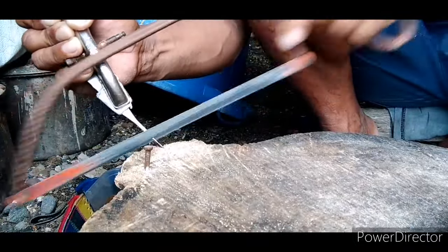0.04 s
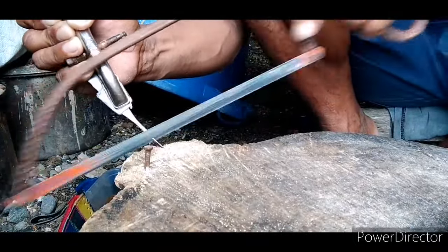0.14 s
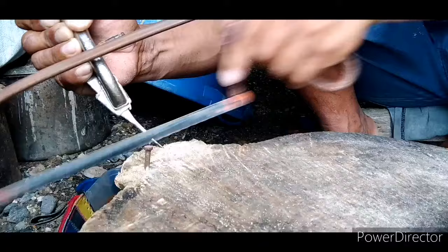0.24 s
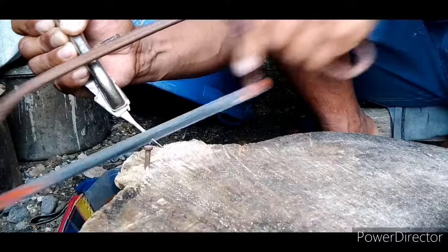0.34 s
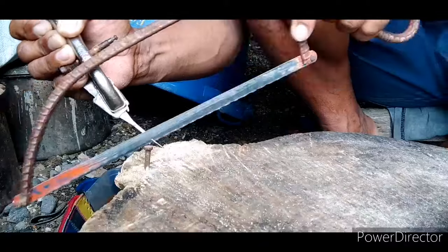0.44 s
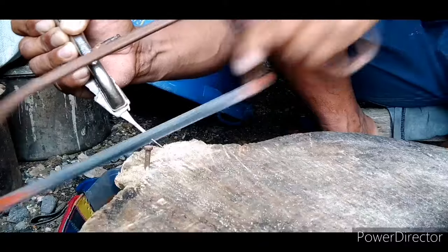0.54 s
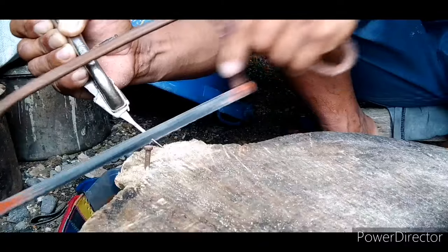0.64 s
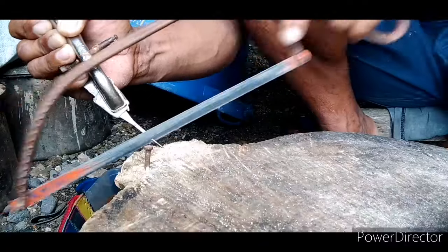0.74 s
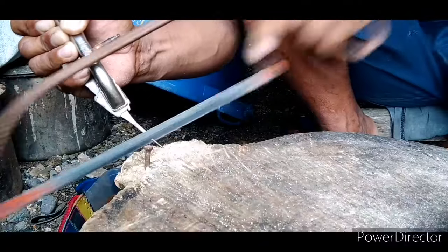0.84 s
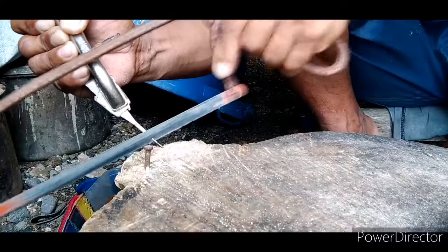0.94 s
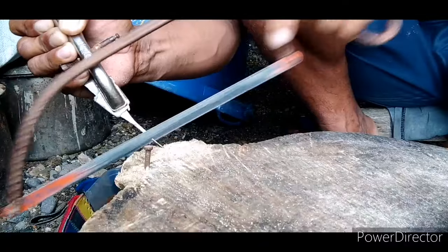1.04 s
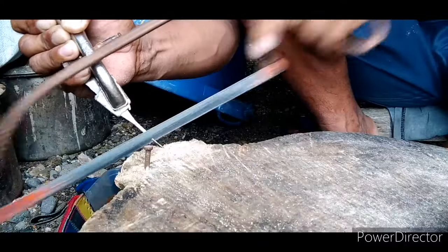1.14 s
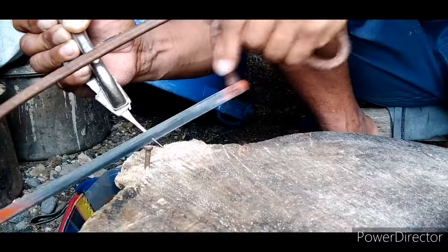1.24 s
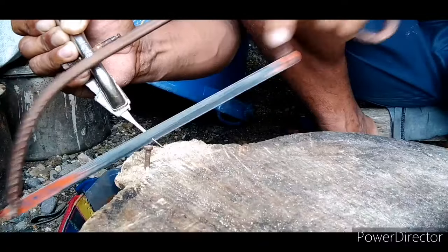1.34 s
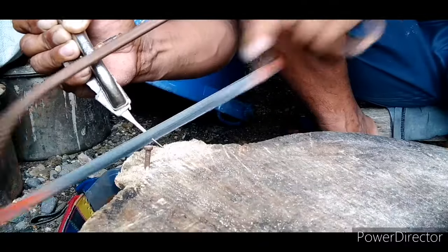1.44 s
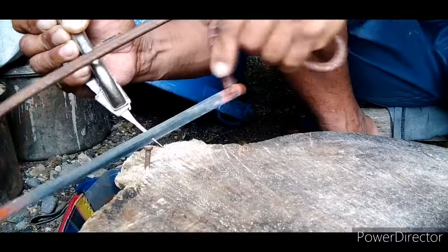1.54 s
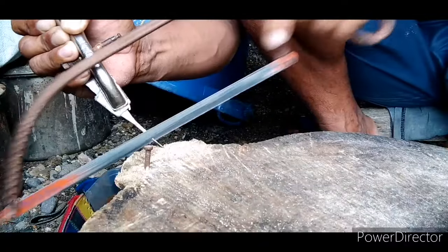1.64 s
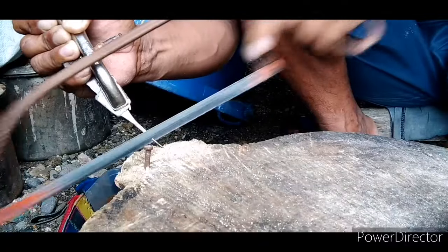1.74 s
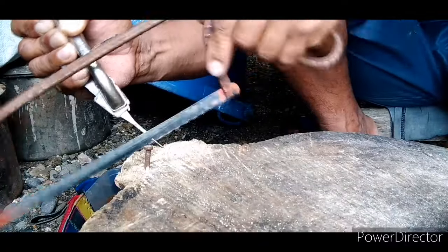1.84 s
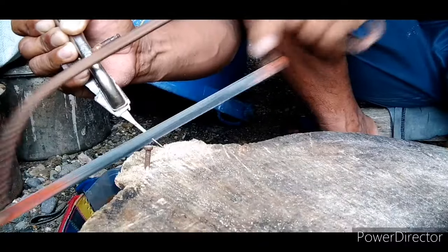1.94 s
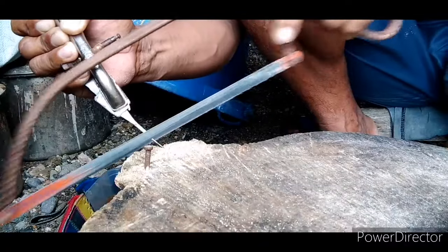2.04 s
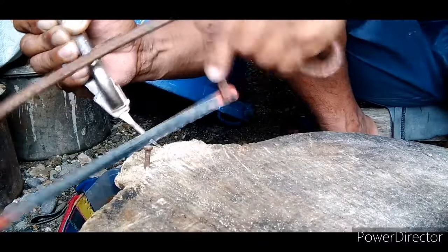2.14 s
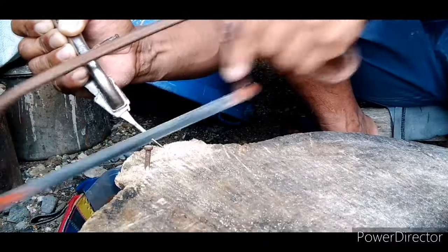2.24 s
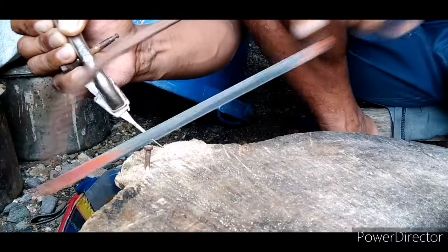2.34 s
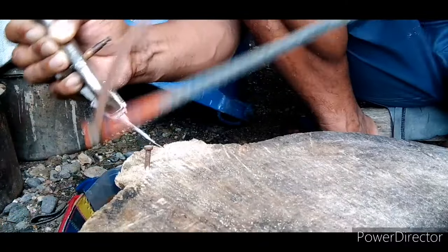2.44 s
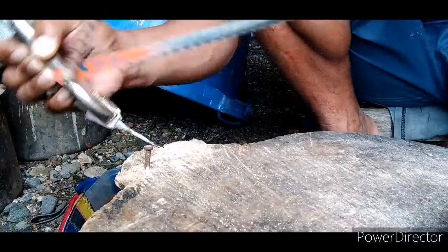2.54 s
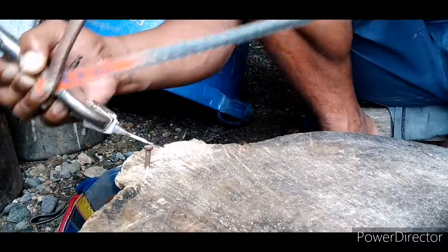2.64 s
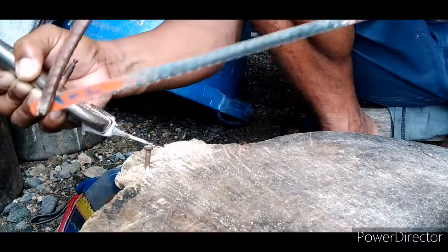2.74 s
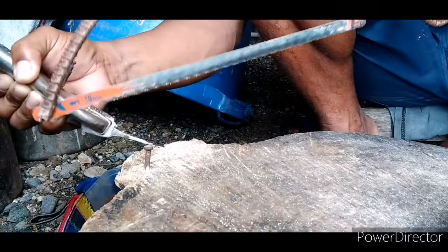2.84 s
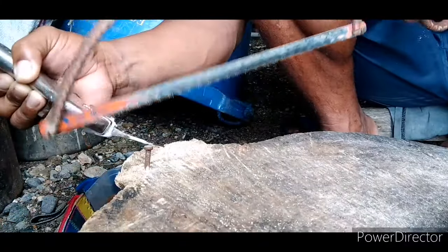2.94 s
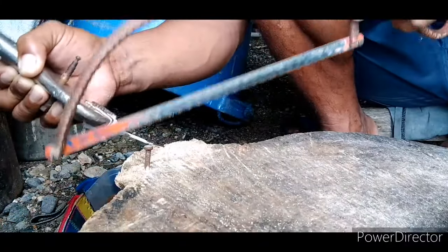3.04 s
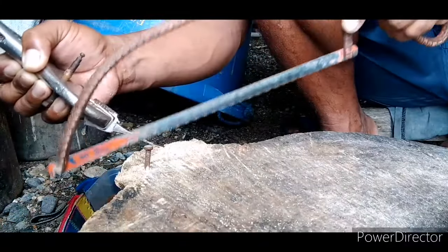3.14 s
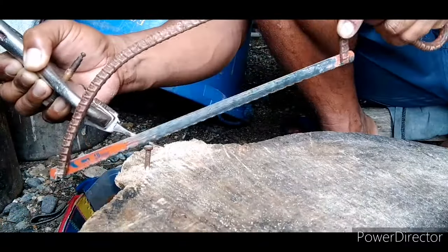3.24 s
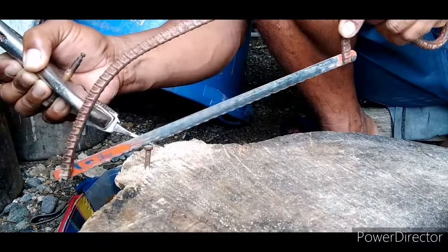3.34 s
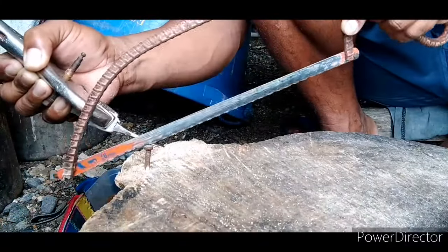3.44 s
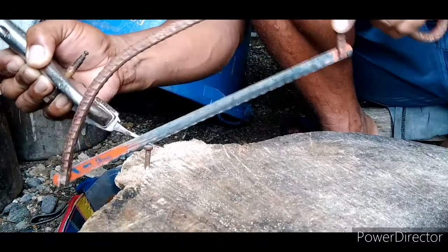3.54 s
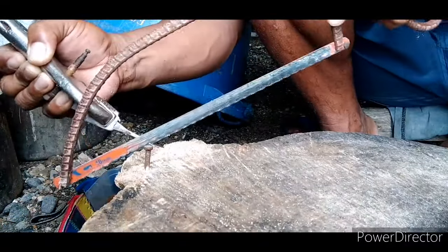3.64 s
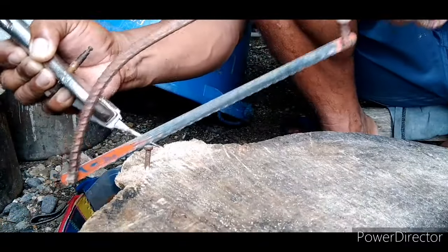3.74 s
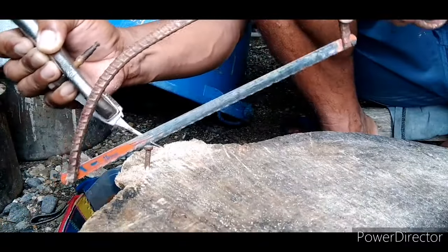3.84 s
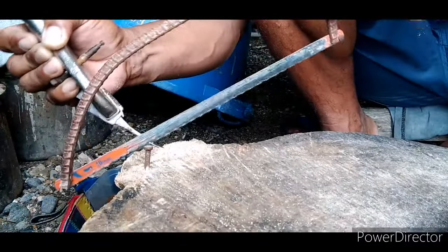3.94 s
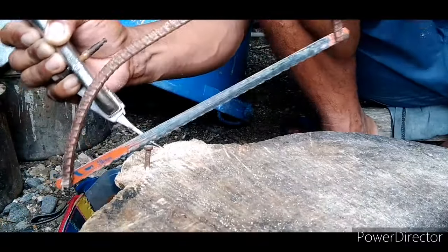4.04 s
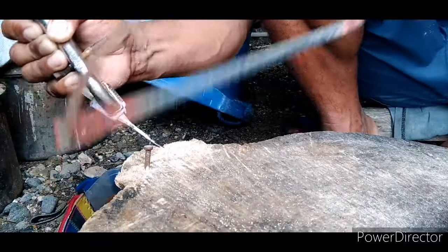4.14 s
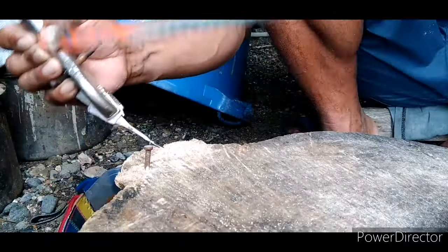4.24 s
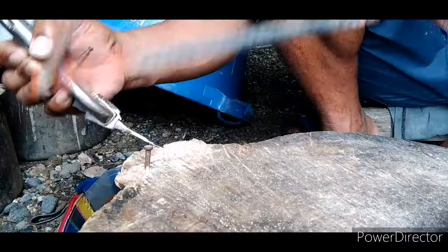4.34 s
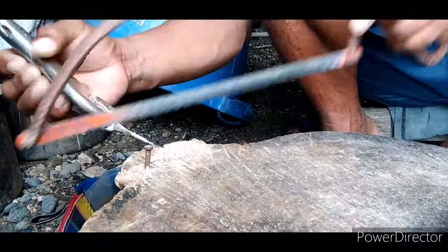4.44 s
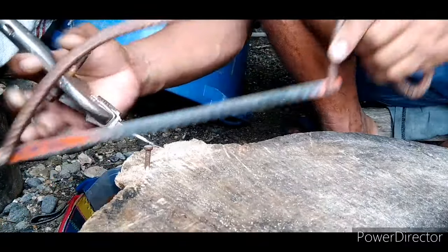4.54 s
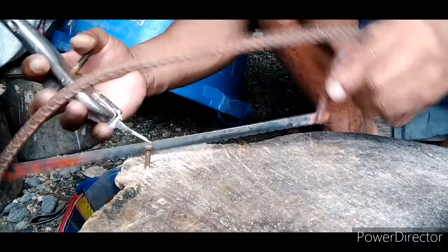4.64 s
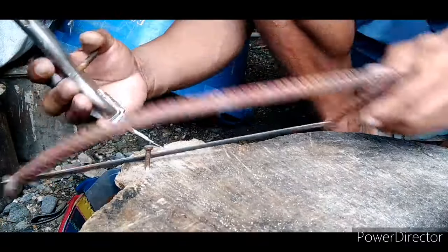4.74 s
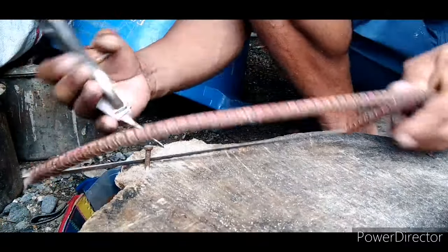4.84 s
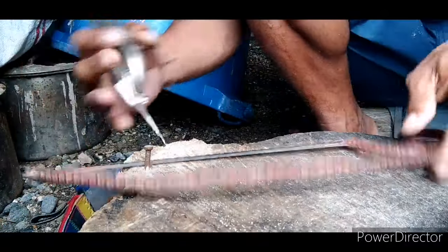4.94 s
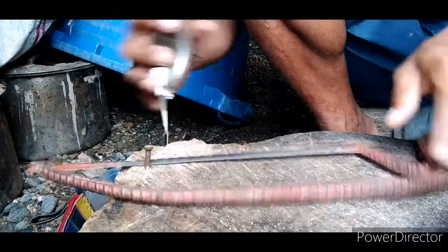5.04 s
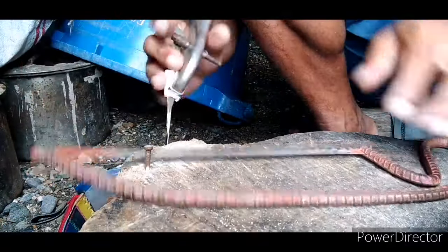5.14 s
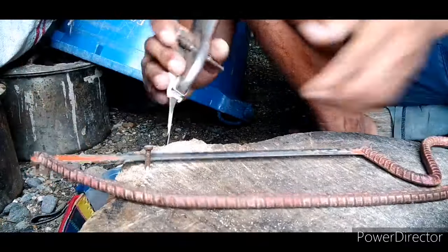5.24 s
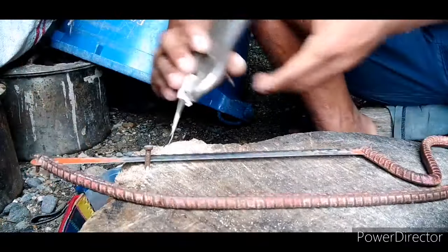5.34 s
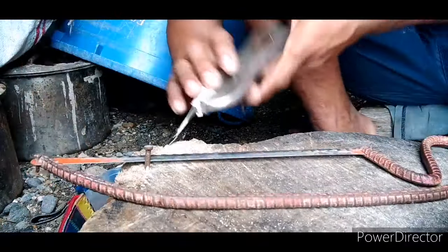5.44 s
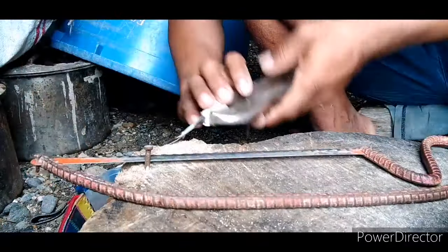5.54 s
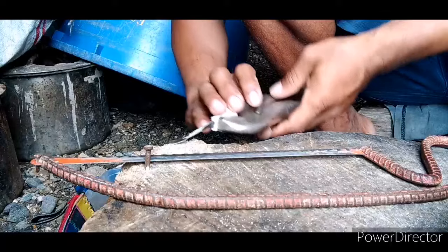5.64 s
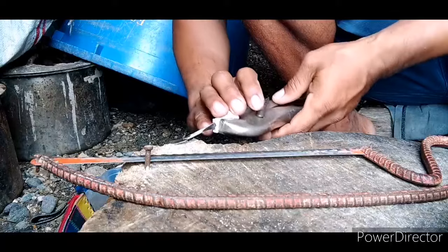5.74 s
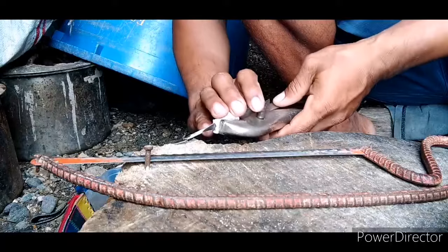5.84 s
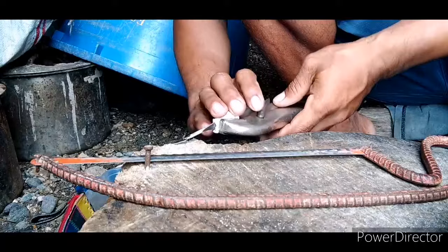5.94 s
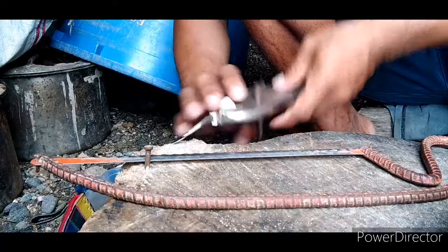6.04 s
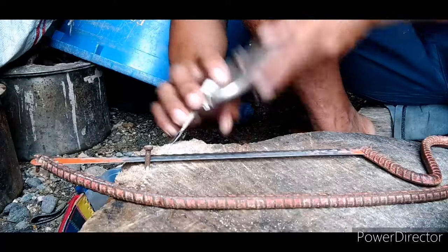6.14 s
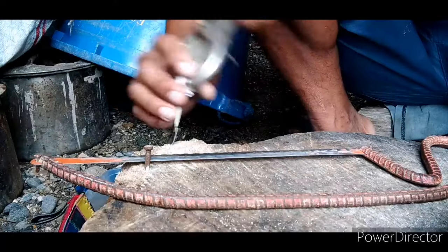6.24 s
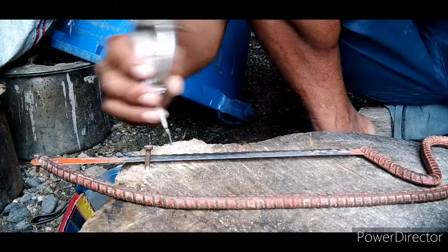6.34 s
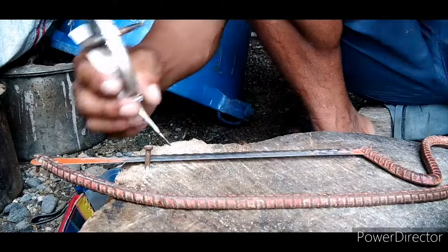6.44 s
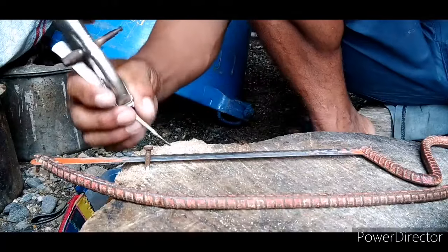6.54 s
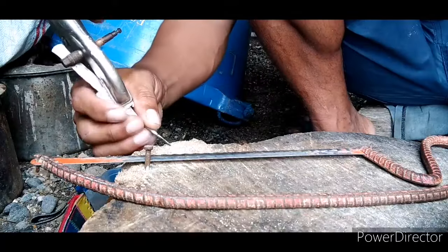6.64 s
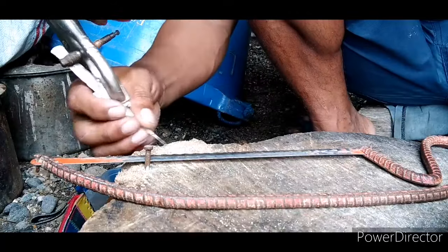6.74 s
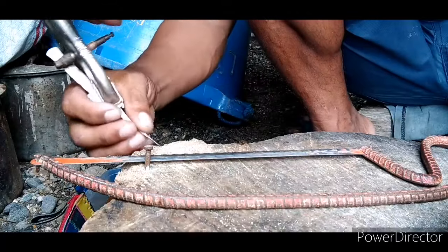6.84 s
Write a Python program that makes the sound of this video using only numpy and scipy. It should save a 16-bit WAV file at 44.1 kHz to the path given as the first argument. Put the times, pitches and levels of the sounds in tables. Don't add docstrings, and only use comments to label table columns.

```python
import sys
import numpy as np
from scipy import signal
from scipy.fft import rfft, irfft
from scipy.io import wavfile

SR = 44100
rng = np.random.default_rng(int(sys.argv[2]) if len(sys.argv) > 2 else 0)


def magnitude_from_level(level_db):
    exponent = np.asarray(level_db, float) / 20
    return 10 ** exponent


def digitize_waveform(pressure):
    field = np.atleast_2d(pressure).T
    bounded = np.clip(field, -1, 1)
    quanta = np.round(bounded * 32767).astype(np.int16)
    wavfile.write(sys.argv[1], SR, quanta)


N = 303408

# (frequency [Hz], density [dB per Hz])
RASP = [(1500, -72), (3550, -1.5), (4200, 2.5), (6000, 0), (9000, 1.5), (12000, 3), (15500, 2.5)]
# (frequency [Hz], density [dB per Hz])
BODY = [(60, -9), (300, -37.5), (700, -18), (1500, -1), (2300, 12.5), (2800, 12), (3250, 13.5), (3600, -24),
        (4200, -76.5)]
# (frequency [Hz], width [Hz], level [dB])
BLADE = [(1829, 45, -6.5), (1849, 30.6, 1), (1935, 68, -11), (2260, 24, -16)]
# (frequency [Hz], width [Hz], level [dB])
STEEL = [(4290, 17.6, -6.5), (5350, 16, -1), (5560, 15, -83), (6860, 400, 3), (7360, 94, -2.5),
         (10500, 32, -2), (10500, 22, -58), (14500, 56, -23), (14800, 63, -8)]
# (frequency [Hz], level [dB], t60 [s])
HUM = [(946, 3.5, 0.084), (657, -5, 0.25), (1336, -8, 0.06)]
# (frequency [Hz], level [dB], t60 [s])
RINGING = [(2945, -12, .45), (4355, 0, 0.27), (4899, -6, .25), (5163, -17, .3), (6062, -12, .33),
           (7725, -14, 0.2)]


def saw():
    to_rasp, to_blade, to_hum, to_body = contact()
    teeth = grit(9000, spread_db=3.0, lump_db=2.0, lump_rate_hz=42)
    bite = to_rasp * teeth
    t = np.arange(N) / SR
    lift_start_s, lift_end_s, pressed_db = 2.44, 2.9, -15
    free = np.where((t > lift_start_s) & (t < lift_end_s), 1, magnitude_from_level(pressed_db))

    rasp = magnitude_from_level(-5.0) * colour(bite, RASP)
    rasp = rasp + magnitude_from_level(-31.0) * ring(bite, damped(STEEL), wander_db=8.0)

    body = magnitude_from_level(10.0) * colour(to_body * magnitude_from_level(1.0 * drift(14)) * teeth, BODY)
    bounce_s = 0.00019 * magnitude_from_level(2.07 * drift(4.64))
    late = np.arange(N) - SR * bounce_s
    body = body + 0.92 * np.array([np.interp(late, np.arange(N), port) for port in body])

    pluck = to_blade * (0.63 * teeth + teeth.mean(0))
    blade = magnitude_from_level(-4) * ring(pluck, damped(BLADE), wander_db=3.0)
    blade = blade + magnitude_from_level(-25.5) * ring(free * pluck, [(1890.0, 0.017, 1.0)], wander_db=-3.0)

    frame = magnitude_from_level(-25.5) * ring(free * bite, RINGING, wander_db=4.5)
    hum = magnitude_from_level(-14) * ring(to_hum * teeth, HUM, wander_db=2.5)
    return rasp + body + blade + frame + hum


# (start [s], rise [s], hold [s], fall [s], rasp [dB])
PUSHES = [
    (.062, 0.062, 0.036, 0.12, -6.5),
    (.414, 0.082, 0.038, 0.068, -7),
    (.772, 0.033, 0.024, 0.11, -3.5),
    (1.086, 0.014, 0.077, 0.052, -8),
    (1.358, 0.038, 0.082, 0.04, -8.5),
    (1.685, 0.027, 0.041, 0.092, -6.5),
    (2.001, 0.032, 0.032, 0.12, -6.5),
    (2.368, 0.036, 0.085, 0.095, -5.5),
]
# (start [s], rise [s], hold [s], fall [s], rasp [dB])
PULLS = [
    (-.06, 0.044, 0.0051, 0.041, -2),
    (0.243, 0.082, 0.028, .07, -11),
    (0.575, 0.093, 0.0076, 0.092, -15),
    (0.901, 0.091, 0.012, 0.074, -14.5),
    (1.203, 0.087, .02, 0.049, -16),
    (1.505, 0.078, 0.026, 0.066, -16),
    (1.815, 0.071, 0.044, 0.019, -18),
    (2.146, 0.1, 0.019, 0.0094, -17),
]
# (start [s], rise [s], hold [s], fall [s], rasp [dB])
CATCHES = [
    (.03, 0.052, 0.0083, 0.02, -22),
    (.414, 0.008, 0.024, 0.042, -27),
    (.741, 0.0071, 0.037, .02, -25.5),
    (1.058, 0.0066, 0.022, .02, -26.5),
    (1.661, .005, 0.0074, 0.053, -25.5),
    (1.963, 0.0078, .004, 0.013, -25.5),
    (2.345, 0.0022, 0.034, 0.017, -21.5),
    (2.27, .02, 0.035, .03, -46),
]
# (start [s], rise [s], hold [s], fall [s], rasp [dB])
GRABS = [
    (.261, .005, 0.014, 0.045, -38),
    (.775, 0.0021, 0.0091, 0.017, -21.5),
    (1.363, 0.003, 0.015, .025, -21.5),
    (1.52, 0.0036, 0.0093, 0.017, -33),
    (1.837, .005, 0.0099, .025, -34.5),
    (2.004, 0.0047, 0.012, 0.031, -12.5),
    (2.373, 0.0036, 0.0078, .02, -12.5),
]
# (start [s], rise [s], hold [s], fall [s], rasp [dB])
RUBS = [
    (3.63, 0.02, .002, 0.023, -39),
    (3.845, 0.011, .004, 0.046, -47),
    (3.98, 0.024, 0.0022, 0.017, -33),
    (5.765, 0.019, .01, .09, -51),
]
# (start [s], rise [s], hold [s], fall [s], rasp [dB])
KNOCK = [
    (4.630, 0.0027, 0.027, 0.066, -12.5),
]
# (rows, rise power, fall power, sag over hold [dB], blade ring [dB], frame hum [dB],
# body [dB])
CONTACTS = [
    (PUSHES, 4.35, 4.53, 4.7, -18, -36, -27),
    (PULLS, 1.65, 4.93, 3.8, -21, -16.5, -23),
    (CATCHES, 1.1, 1.4, 0.6, -7, -34, -23),
    (GRABS, 1.2, 4.8, 0.6, -14, -40, -25),
    (RUBS, 1.6, 5.0, 0.5, -14, -12, -14.5),
    (KNOCK, 1.2, 2.9, 32.5, -30, -54, -61),
]


def contact():
    out = 0
    for rows, rise, fall, sag_db, blade_db, hum_db, body_db in CONTACTS:
        to_rasp = swell(rows, rise, fall, sag_db)
        to_blade = magnitude_from_level(blade_db) * swell(rows, rise, fall, sag_db, follow=0.94)
        to_hum = magnitude_from_level(hum_db) * swell(rows, rise, fall, sag_db, follow=0.69, fade_db=8.5)
        to_body = magnitude_from_level(body_db) * swell(rows, rise, fall, sag_db, follow=0.69)
        out = out + np.array([to_rasp, to_blade, to_hum, to_body])
    return out


# (start [s], rise [s], hold [s], fall [s], level [dB])
HELD = [
    (4.221, .005, 0.0072, 0.0063, -37.5),
    (4.237, 0.0079, .003, 0.064, -39),
]
# (start [s], rise [s], hold [s], fall [s], level [dB])
FREED = [
    (4.273, 0.0245, .002, 0.016, -34),
]
# (start [s], rise [s], hold [s], fall [s], level [dB])
LAID = [
    (5.117, 0.014, .004, 0.037, -41),
    (5.16, .045, .003, .01, -43),
    (5.204, 0.013, 0.0037, 0.043, -28),
    (5.232, 0.0089, 0.045, 0.19, -28.5),
]
# (frequency [Hz], width [Hz], level [dB])
FRAME = [(3280, 57, -9), (3900, 20, -11), (4516, 16, -0.5), (5416, 6.6, -5.5), (5970, 17, -12),
         (7320, 10, -11), (9350, 40, -3), (9800, 42, -5), (10500, 27, -4.5), (11200, 48, -3),
         (11900, 50, -8), (12900, 93, -5), (13600, 42, -16), (14700, 43, -7)]


def drag():
    ribs = grit(4000, spread_db=3.0, lump_db=1.5, lump_rate_hz=85)
    held, freed, laid = (swell(rows, 2.1, 3.9, sag_db=6) * ribs for rows in (HELD, FREED, LAID))
    scrape = held + freed + laid
    modes = magnitude_from_level(5.0) * ring(held, damped(STEEL[:1]), wander_db=0.0)
    modes = modes + magnitude_from_level(-9) * ring(freed, RINGING, wander_db=2)
    modes = modes + magnitude_from_level(-8) * ring(laid, damped(FRAME), wander_db=-1.5)
    return modes + magnitude_from_level(-5.5) * colour(scrape, RASP) + magnitude_from_level(-15.5) * colour(scrape, BODY)


# (time [s], peak [dB], pitch [Hz], pan, + is left [dB])
TICKS = [(2.6778, -16, 8200, 4), (2.8415, -27, 6900, 6), (3.0379, -10.5, 3390, -1.5),
         (3.1485, -16.5, 6770, -6), (3.247, -27, 10500, -7), (3.322, -22, 7600, 8),
         (3.3596, -23, 11200, -3), (3.396, -23, 7800, -6), (3.4785, -20, 11400, 16),
         (3.7492, -22, 6860, -15), (4.0675, -22, 11000, 5), (4.1134, -23, 7040, -5),
         (4.2072, -22, 10100, 8), (4.2877, -14, 10600, 1), (4.474, -22, 7440, 10), (4.6302, -20, 9400, -15),
         (4.729, -24, 6700, 4.0), (4.7455, -18, 7000, -8), (4.8871, -22, 7050, -5),
         (5.1725, -23, 11300, 10), (5.7462, -25, 10600, -3), (5.7807, -20, 7770, 7),
         (6.0465, -27, 10300, -16), (6.115, -26.5, 7250, 9), (6.2053, -25, 6600, 5),
         (6.6357, -16.5, 10500, 3)]
# (time [s], peak [dB], pan, + is left [dB])
TAPS = [
    (2.6038, -20, 11),
    (3.023, -17.5, 2),
    (3.6451, -14, 12.5),
    (3.868, -26.5, 17),
    (3.9988, -13, 9),
    (4.2254, -20, 6),
    (4.2398, -8, 13.5),
    (5.2165, 1.5, -3.5),
    (6.485, -21.5, 17),
]


def ticks():
    length, tap_hz, t60_s = 1200, 4360, 0.013
    out, t = np.zeros((2, N)), np.arange(length) / SR
    touches = TICKS + [(s, db, tap_hz, pan_db) for s, db, pan_db in TAPS]
    for s, db, hz, pan_db in touches:
        crack = rng.standard_normal((2, length))
        shape = magnitude_from_level(-60 * t / t60_s) * (0.7 * crack + 0.5 * np.sin(2 * np.pi * hz * t))
        gain = magnitude_from_level(db - 19.5 + 0.5 * pan_db * np.array([[1], [-1]]))
        i = round(s * SR)
        out[:, i:i + length] += (gain * shape)[:, :N - i]
    return out


# (time [s], peak [dB], pitch [Hz], t60 [s])
THUDS = [(2.264, -33.5, 156, 0.2), (3.61, -39, 930, 0.054), (3.63, -41, 674, 0.15),
         (3.996, -43, 1030, 0.067), (4.093, -27.5, 740, 0.13), (4.108, -49, 843, 0.05),
         (4.235, -44.5, 573, 0.095), (4.544, -35, 730, 0.12), (4.756, -40, 145, 0.041),
         (4.979, -41, 950, 0.039), (5.017, -37, 400, 0.12), (5.112, -33.5, 352, 0.15),
         (5.198, -29.5, 450, 0.2), (5.246, -34.5, 706, 0.23), (5.291, -32.5, 457, 0.24),
         (5.391, -38.5, 436, 0.26), (5.42, -43, 690, 0.14), (5.782, -45.5, 1150, 0.54)]


def thuds():
    length = 6000
    out, t = np.zeros((2, N)), np.arange(length) / SR
    for s, db, hz, t60 in THUDS:
        puff = rng.standard_normal((2, length))
        wood = signal.butter(2, [hz / 2.2, hz * 1.55], "band", fs=SR, output="sos")
        knock = signal.sosfilt(wood, (puff[0] + 0.91 * puff) * magnitude_from_level(-60 * t / t60))
        i = round(s * SR)
        out[:, i:i + length] += magnitude_from_level(db + 2.5) * knock / np.abs(knock).max()
    return out


# (time [s], peak [dB], fall [s])
GUSTS = [
    (0.814, -23.5, 0.028),
    (1.389, -57, 0.032),
    (2.391, -35, 0.049),
    (2.461, -27.5, 0.028),
]


def gusts():
    t, push = np.arange(N) / SR, 0
    for s, db, fall in GUSTS:
        age = np.maximum(t - s, 0)
        onset = 1 - np.exp(-age / 0.00084)
        swing = np.exp(-age / fall) - 0.43 * np.exp(-age / 0.074)
        push = push + magnitude_from_level(db + 21.5) * onset * swing
    strokes = swell(PUSHES + PULLS, 1.5, 0.54, 0.5) ** 0.39
    buffet = strokes * magnitude_from_level(-45.0 + 1.0 * drift(18.0)) * drift(47)
    return push * magnitude_from_level([[-30], [0]]) + buffet * magnitude_from_level([[-20], [0]])


# (time [s], level [dB])
RUSTLE = [
    (2.62, -54),
    (3.4, -36),
    (3.94, -53),
    (4.3, -39.5),
    (5.1, -46),
    (5.5, -53),
    (6.0, -66),
    (6.88, -35.5),
]
# (start [s], rise [s], hold [s], fall [s], level [dB])
ARM_SWEEPS = [
    (3.4, 0.13, 0.61, .3, -76),
    (4.6, 0.78, 0.066, 0.13, -54.5),
]


def rustle():
    stir = magnitude_from_level(-66) + swell(ARM_SWEEPS, 1.8, 2.1, 0.5)
    crackle = colour(grit(2500, spread_db=23.0, lump_db=6.5, lump_rate_hz=38), RASP)
    return magnitude_from_level(in_time(RUSTLE) - 24) * crackle + magnitude_from_level(-0.5) * stir * drift(113)


# (frequency [Hz], density [dB per Hz])
AIR = [(30, 17), (120, 16.5), (210, 2), (500, 7.5), (1100, 12), (1500, 4), (2500, 5.5), (6000, -1),
       (10000, -1.5), (15500, -0.5)]


def yard():
    air_db, alike_hz = -54, 570
    both, *own = rng.standard_normal((3, N))
    own = np.array(own)
    flutter = magnitude_from_level(0.9 * drift(2) + 0.7 * drift(25))
    low, high = (signal.butter(1, alike_hz, kind, fs=SR, output="sos") for kind in ("low", "high"))
    air = signal.sosfilt(low, both + 0.39 * own) + signal.sosfilt(high, own)
    return magnitude_from_level(air_db) * flutter * colour(air, AIR)


def swell(rows, rise_power, fall_power, sag_db, follow=1, fade_db=0):
    t, out = np.arange(N) / SR, np.zeros(N)
    for s, rise, hold, fall, db in rows:
        end = s + rise + hold + fall
        part = slice(max(round(s * SR), 0), max(round(end * SR), 0))
        now = t[part]
        up = np.sin(np.pi / 2 * np.clip((now - s) / rise, 0, 1))
        down = np.sin(np.pi / 2 * np.clip((end - now) / fall, 0, 1))
        sag = magnitude_from_level(-sag_db * np.clip((now - s - rise) / hold, 0, 1))
        shape = up ** rise_power * down ** fall_power * sag
        fade = fade_db * ((now - s) / (end - s) - 1.0)
        out[part] += magnitude_from_level(db - fade) * shape ** follow
    return out


def grit(per_s, spread_db, lump_db, lump_rate_hz):
    shared, lag_s = 0.095, 0.0003
    sizes_db = spread_db * np.minimum(rng.exponential(1, (3, N)), 5)
    sizes = magnitude_from_level(sizes_db) * rng.choice([-1, 1], (3, N))
    both, left, right = sizes * (rng.random((3, N)) < per_s / SR)
    common = np.array([np.roll(both, round(lag_s * SR)), both])
    pair = np.sqrt(shared) * common + np.sqrt(1 - shared) * np.array([left, right])
    return rms_one(pair * magnitude_from_level(lump_db * drift(lump_rate_hz)))


def ring(x, modes, wander_db):
    longest_s = 0.92
    out = 0
    for hz, db, t60 in modes:
        r = magnitude_from_level(-60 / (min(t60, longest_s) * SR))
        w = 2 * np.pi * hz / SR
        fed = x * magnitude_from_level(db + wander_db * drift(10.1)) + 1e-18
        gain = np.sin(w) * 2 * np.sqrt(1 - r)
        out = out + signal.lfilter([0, gain], [1, -2 * r * np.cos(w), r * r], fed)
    return out


def damped(peaks):
    return [(hz, db, np.log(1000) / np.pi / width_hz) for hz, width_hz, db in peaks]


def colour(x, points, size=4096):
    hz, db = np.transpose(points)
    grid_hz = np.arange(size // 2 + 1) * SR / size
    cep = irfft(np.log(magnitude_from_level(np.interp(np.log(grid_hz + 1), np.log(hz), db))))
    cep[1:size // 2] *= 2
    cep[size // 2 + 1:] = 0
    impulse = irfft(np.exp(rfft(cep)))
    return signal.fftconvolve(x, impulse[None], axes=1)[:, :N]


def drift(rate_hz):
    r = np.exp(-2 * np.pi * rate_hz / SR)
    slow = signal.lfilter([1], [1, -2 * r, r * r], rng.standard_normal(N + SR))
    return rms_one(slow[SR:])


def in_time(rows):
    s, db = np.transpose(rows)
    return np.interp(np.arange(N) / SR, s, db, left=-120, right=-120)


def rms_one(x):
    return x / np.sqrt(np.mean(x ** 2) + 1e-20)


def scene():
    near = saw() + drag() + ticks() + thuds()
    echoes = magnitude_from_level(-18) * np.roll(near[::-1], round(0.009 * SR), axis=1)
    echoes = echoes + magnitude_from_level(-13.0) * np.roll(near, round(0.019 * SR), axis=1)
    return near + echoes + gusts() + rustle() + yard()


def top_cut(x):
    return signal.sosfilt(signal.butter(12, 16020, fs=SR, output="sos"), x)


# (frequency [Hz], width [Hz], gain [dB])
PORTS = [
    [(1150, 140, 5), (4350, 720, 8.5), (5650, 1840, 7), (7250, 1910, 16.5)],
    [(10600, 4700, 15.5)],
]


def record(dry):
    out = dry.copy()
    for k, cavity in enumerate(PORTS):
        for hz, width_hz, db in cavity:
            a, w = np.sqrt(magnitude_from_level(db)), 2 * np.pi * hz / SR
            q = np.sin(w) * width_hz / hz / 2
            top = [1 + q * a, -2 * np.cos(w), 1 - q * a]
            bottom = [1 + q / a, -2 * np.cos(w), 1 - q / a]
            out[k] = signal.lfilter(top, bottom, out[k])
    out = out / (1 + np.abs(out / 0.9) ** 2.0) ** (1 / 8.9)
    low_pass = signal.ellip(10, 0.5, 28, 15930, fs=SR, output="sos")
    out = signal.sosfilt(low_pass, out)
    return top_cut(np.clip(out, -1, 1))


dry = scene()
out = record(dry)
digitize_waveform(out)
```